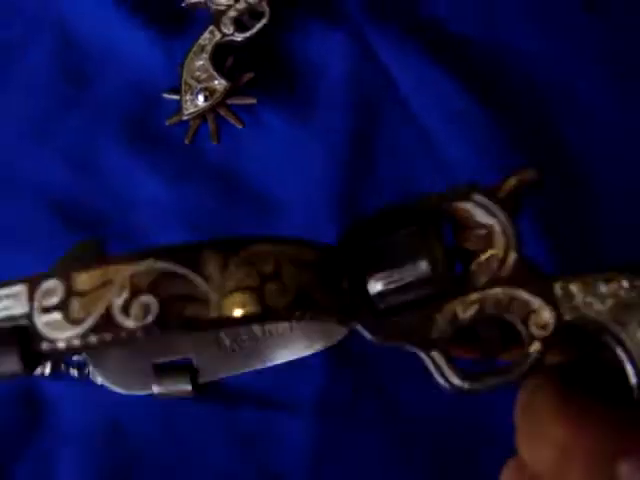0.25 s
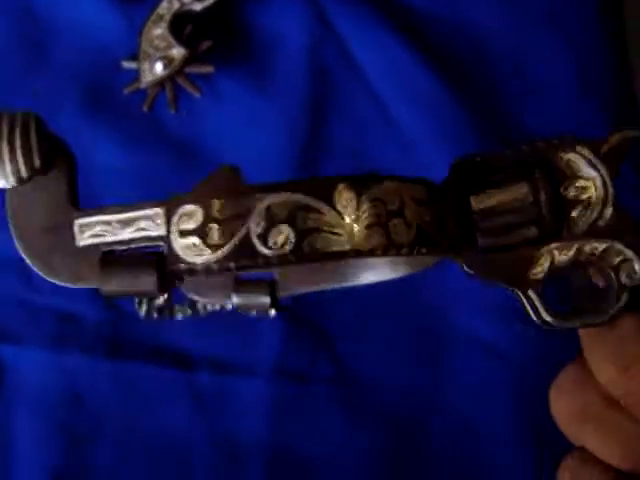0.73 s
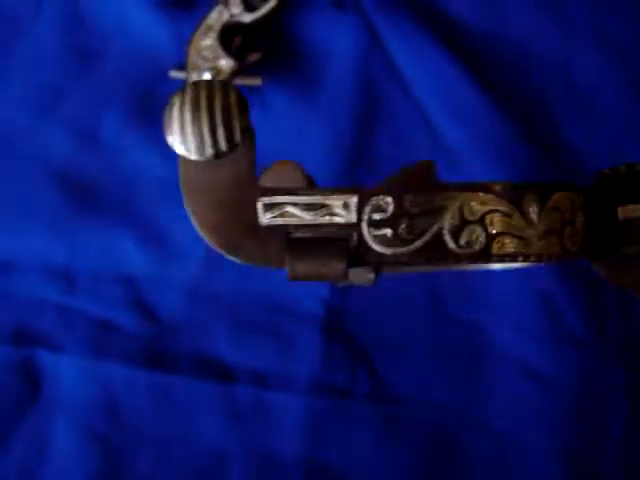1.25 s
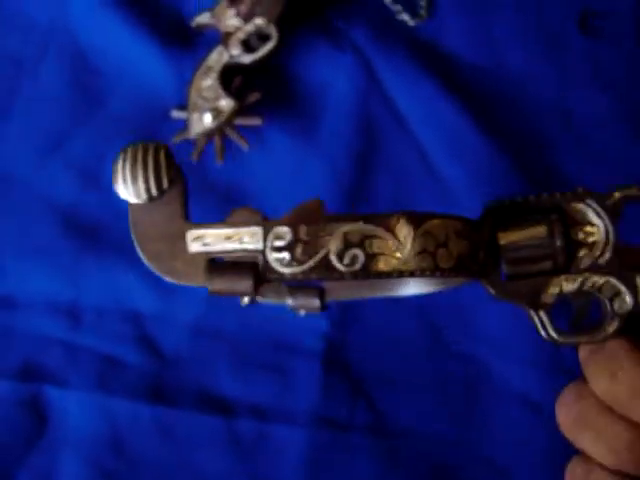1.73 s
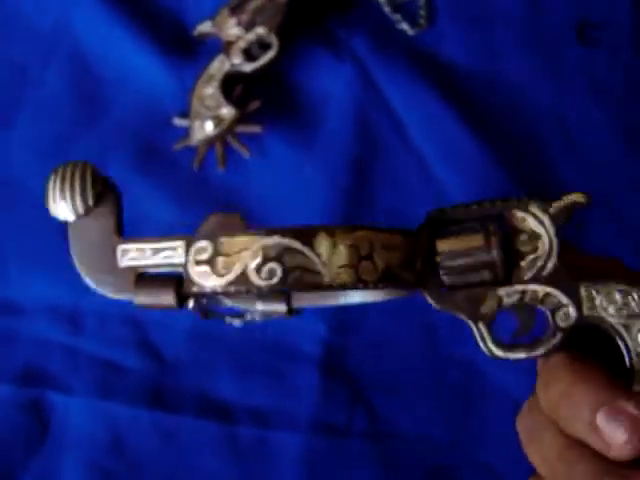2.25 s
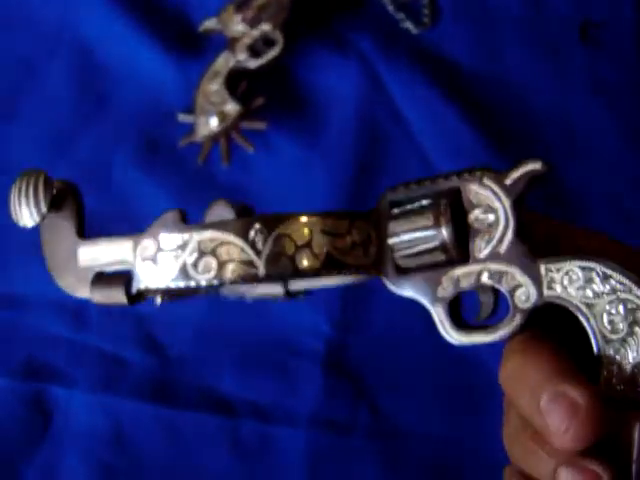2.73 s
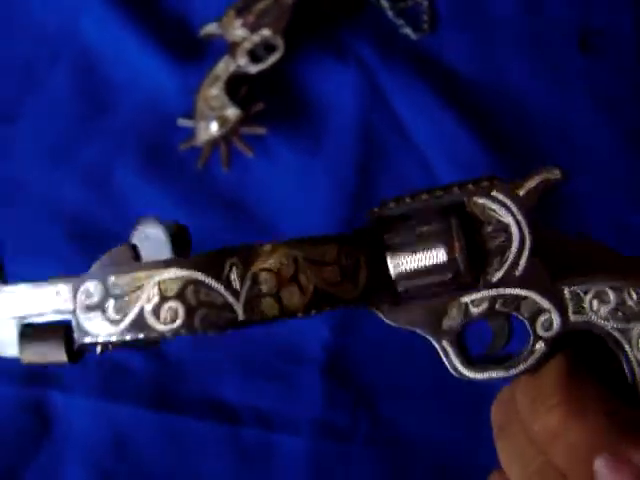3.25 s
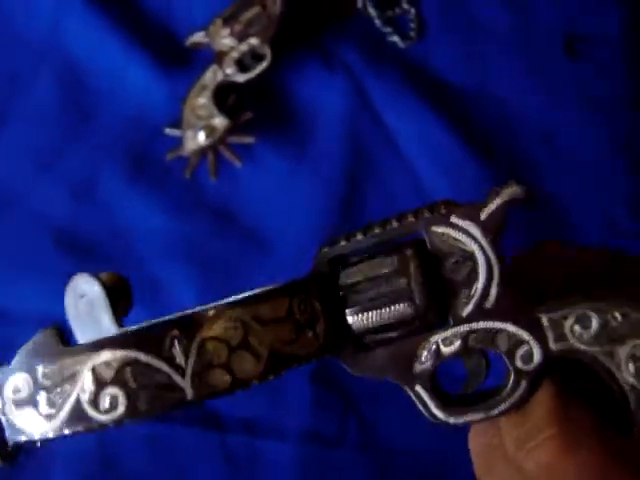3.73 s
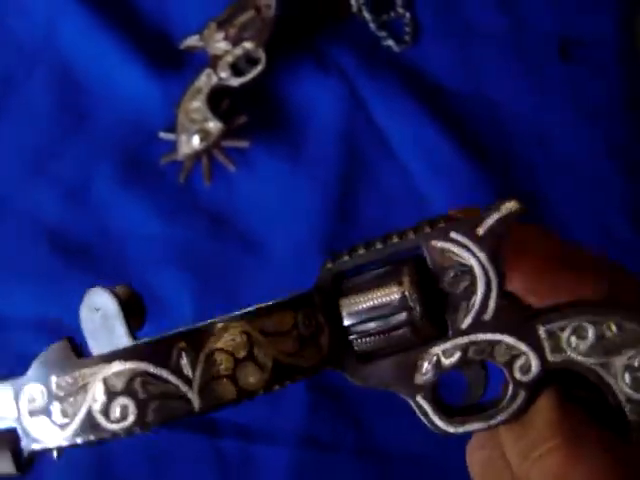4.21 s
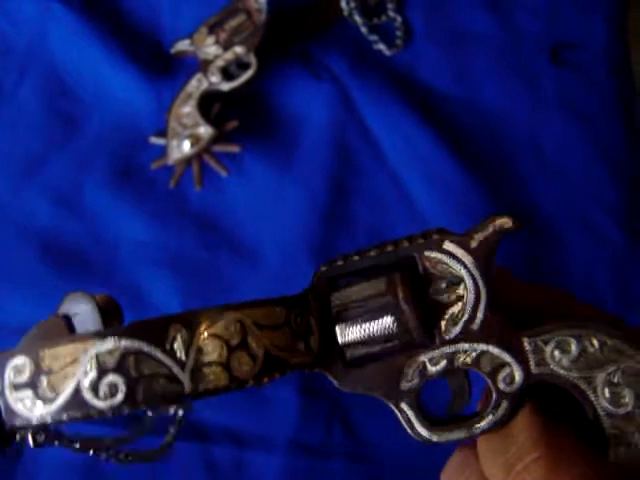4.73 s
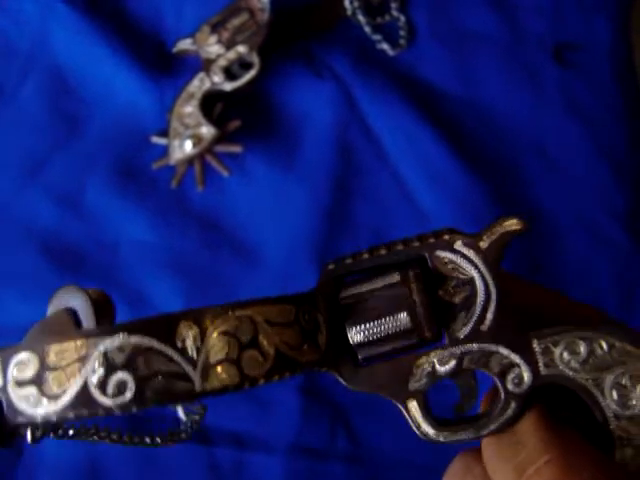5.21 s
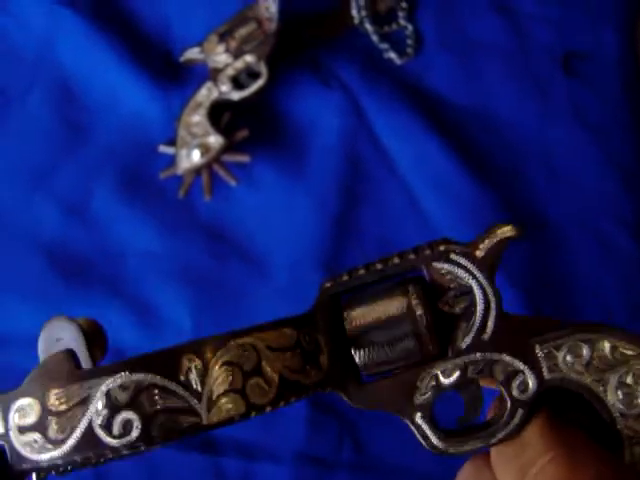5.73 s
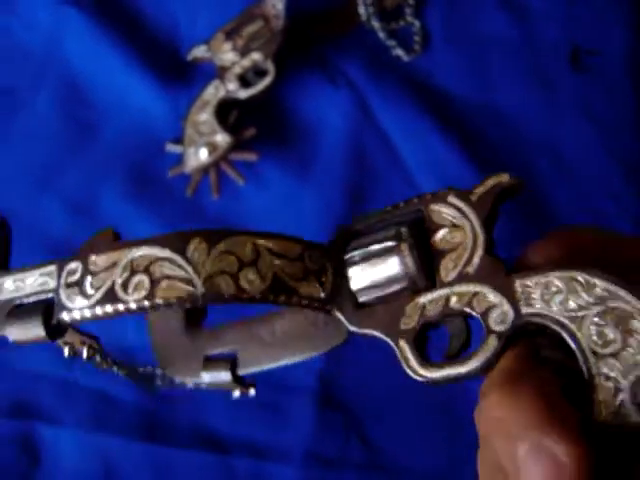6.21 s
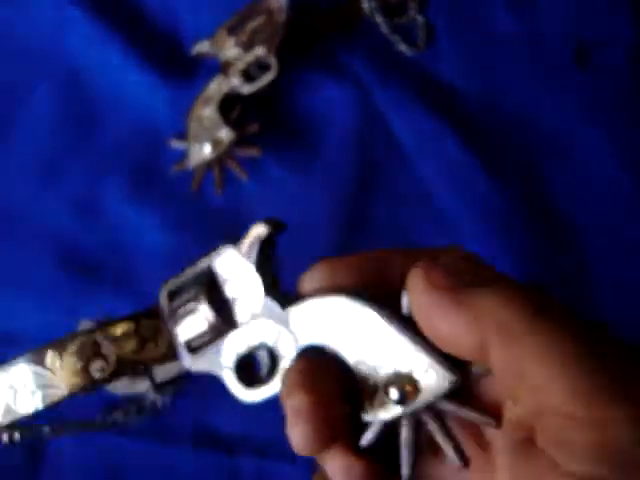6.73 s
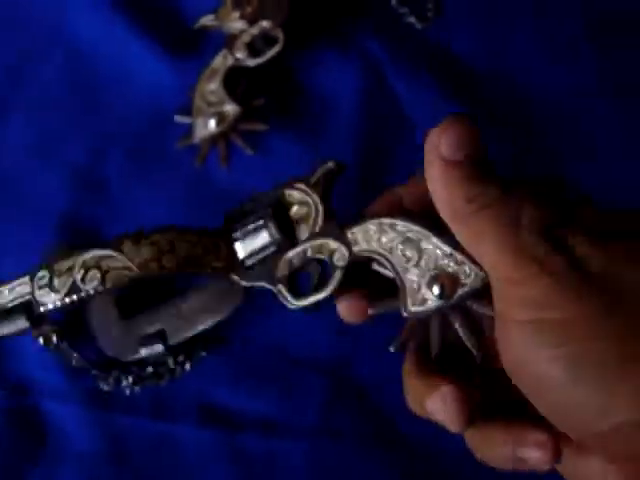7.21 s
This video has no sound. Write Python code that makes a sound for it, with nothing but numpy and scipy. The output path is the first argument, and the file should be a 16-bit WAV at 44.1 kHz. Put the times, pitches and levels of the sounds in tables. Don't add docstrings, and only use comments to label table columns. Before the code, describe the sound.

Bright metal links clink in a turning hand over a fading diesel hum, ending with faint birdsong, a dull knock and a final jangle.

```python
import sys
import numpy as np
from scipy import signal
from scipy.fft import rfft, irfft, next_fast_len
from scipy.io import wavfile
from scipy.ndimage import uniform_filter1d

SR = 44100
rng = np.random.default_rng(int(sys.argv[2]) if len(sys.argv) > 2 else 0)


def transcribe(signal):
    frames = np.atleast_2d(signal).T
    limited = np.clip(frames, -1, 1)
    pcm = np.round(limited * 32767).astype(np.int16)
    wavfile.write(sys.argv[1], SR, pcm)


def level_to_linear(level):
    exponent = np.asarray(level, float) / 20
    return 10 ** exponent


N = 329427
T = np.arange(N) / SR

# (time [s], cycle rate [Hz])
CYCLE_RATE = [(0, 11.726), (.8, 11.678), (1.2, 11.558), (2.0, 11.514), (2.3, 11.365), (2.9, 11.278),
              (3.4, 11.15), (3.8, 11.125), (4.7, 11.025), (5.3, 11.038), (5.8, 10.996), (6.2, 11.002),
              (6.7, 11.068), (7.2, 11.013), (7.47, 11.017)]
# (time [s], level [dB])
FIRING_NOTE = [(0, -20.5), (.6, -22.5), (1.0, -24.5), (1.3, -22.5), (1.9, -21), (2.2, -25), (3.2, -31.5),
               (3.7, -39), (4.0, -42), (4.2, -38), (4.4, -44), (4.7, -46.5), (5.2, -39.5), (5.6, -42.5),
               (7.47, -45)]
# (multiple of cycle [1], time [s], half width [s], level [dB])
PATH_SWELLS = [(17, 0, .7, -38), (17, 1.05, .15, -40), (17, 1.95, .45, -39), (17, 3.0, .4, -36),
               (17, 3.8, .3, -41.5), (17, 4.3, .2, -39), (17, 4.8, .25, -45), (17, 5.85, .7, -43.5),
               (16.5, 1.1, .55, -33), (16.5, 3.6, .45, -40.5)]
# (multiple of cycle [1], level over the roar [dB])
ENGINE_ORDERS = [(5, -24), (7, -40.5), (8, -20), (9, -17), (10, -25.5), (11, -12.5), (13, -23), (15, -20.5),
                 (18, -9), (19, -11.5), (20, -29.5), (21, -11.5), (22, -9.5), (23, -7.5), (24, -19),
                 (25, -41), (26, -22.5), (27, -12), (28, -16.5), (29, -18), (30, -27), (31, -15.5),
                 (32, -23.5), (33, -32), (35, -19)]
# (frequency [Hz], density [dB per Hz])
ROAR_COLOUR = [(25, -16), (55, -31.5), (110, -22.5), (150, -21), (175, 4), (215, 2.5), (330, -3),
               (480, -10), (900, -13.5), (1500, -23.5), (3000, -33), (6000, -42), (10500, -49)]
ROAR_DB, FADE_DB_PER_S, STANDS_S = -32, 2.5, 4.6
# (frequency [Hz], density [dB per Hz])
ROOM_COLOUR = [(22, -4.5), (50, 4), (120, 3.5), (150, 0.5), (250, 1.5), (500, -4), (1000, -9.5),
               (2000, -15.5), (4000, -21), (7000, -24.5), (10500, -26)]
ROOM_DB = -48

# (frequency [Hz], width [Hz], level [dB])
STEEL_MODES = [(4660, 280, 15), (4940, 160, -20.5), (5630, 62, 3), (6696, 140, 29.5), (7270, 37, -24.5),
               (7020, 49, -15.5), (8000, 27, -17.5), (8260, 130, -5.5), (8240, 67, -21.5), (8730, 360, 19),
               (9454, 23, 14.5), (9850, 33, -21)]
# (frequency [Hz], width [Hz], level [dB])
BAND_MODES = [(1180, 200, 9), (1950, 100, 5), (2580, 180, -13), (2903, 94, 1.5), (3350, 350, 0),
              (3900, 230, -12), (4400, 160, -13)]
# (time [s], peak level [dB], link note [Hz], ring t60 [s])
LOOSE_LINKS = [(0.1315, -47.5, 5900, .035), (0.4214, -39.5, 6750, .035), (.7336, -43, 5260, 0.066),
               (0.852, -43.5, 8320, 0.047), (0.8976, -30.5, 10300, 0.14), (1.317, -34, 8020, 0.11),
               (1.7328, -32, 8190, 0.072), (1.864, -38.5, 7240, 0.02), (2.1533, -41, 8220, 0.03),
               (3.271, -42, 6750, .03), (3.272, -43, 9570, .03), (3.6776, -41, 9200, 0.023),
               (4.058, -31.5, 6430, 0.027), (4.187, -46, 5420, .02), (4.3917, -43.5, 6380, 0.024),
               (5.0206, -42.5, 7920, .05), (5.365, -33, 9240, 0.035), (5.641, -35.5, 9630, 0.014),
               (5.67, -44, 6810, .035), (5.885, -47.5, 7200, .02), (6.074, -40, 8160, 0.026),
               (6.8825, -50, 8000, 0.032)]
LINK_BAND_DB = -21.5
# (time [s], peak level [dB], link note [Hz], heel band level [dB])
BAND_TAPS = [(.259, -40, 6750, -45), (0.336, -44.5, 5540, -46), (0.4546, -29.5, 6750, -41),
             (0.4695, -39, 9310, -41), (.682, -45, 6850, -44.5), (.711, -49.5, 5740, -49),
             (1.1987, -46, 4900, -41), (3.134, -42, 5740, -45), (3.218, -55.5, 7030, -49.5),
             (3.3445, -41, 8000, -33), (3.514, -54.5, 5450, -43.5), (4.09, -47, 7160, -59),
             (4.166, -45.5, 8360, -43.5), (4.801, -45, 5150, -41), (4.945, -50.5, 7700, -44),
             (5.11, -45.5, 6630, -48), (5.2695, -46, 8850, -46), (5.3807, -42, 7730, -37),
             (5.43, -47.5, 9550, -60), (5.4504, -42, 8600, -37), (5.747, -42, 4950, -50.5),
             (5.819, -47, 6750, -45), (7.331, -32, 7370, -38)]
# (time [s], peak level [dB], link note [Hz], heel band level [dB], ring t60 [s])
END_KNOCKS = [(0.165, -57, 4900, -49, 0.029), (0.1762, -17, 8730, -28, 0.012),
              (3.1213, -45, 4870, -35, 0.014), (3.665, -32, 5030, -42, 0.04),
              (4.5949, -37.5, 7100, -43.5, 0.013), (5.2765, -42, 4920, -48, .03),
              (5.659, -20, 6830, -30.5, 0.015), (5.688, -34.5, 8760, -44, .012),
              (5.8112, -33, 8000, -44, .017), (7.317, -26, 7370, -39, 0.06), (7.409, -40, 8220, -50, 0.05)]
TAP_T60_S, MIDDLE_HZ, END_HZ = 0.046, 2895, 4820
# (time [s], length [s], peak level [dB], one link [Hz], other link [Hz])
TAUT_RUNS = [(0.174, 0.0038, -28, 6430, 7240), (0.188, .002, -30.5, 3300, 3400),
             (4.8, .002, -30.5, 3440, 3316), (5.69, 0.0034, -43.5, 3750, 3900),
             (0.206, .02, -51.5, 8970, 9570), (3.12, 0.015, -42, 7280, 6800),
             (4.898, .009, -20.5, 6450, 6860), (4.923, 0.014, -38, 7440, 6860),
             (4.952, 0.029, -44, 7560, 7000), (5.45, .003, -34, 4600, 3800), (7.316, .004, -33, 4450, 4400),
             (5.658, .006, -29, 5700, 5710), (5.766, 0.02, -34, 5700, 6100),
             (5.763, 0.026, -35, 7400, 6150), (5.769, 0.0217, -32, 9300, 9950),
             (5.779, 0.011, -21, 6750, 6790), (5.817, 0.017, -44, 7020, 6340),
             (6.069, 0.021, -45.5, 9980, 5520), (6.075, .012, -41.5, 8100, 8170),
             (0.177, 0.0074, -38, 4250, 4200), (7.139, .039, -46, 9850, 9300),
             (7.22, 0.035, -35, 9900, 9260), (7.257, 0.022, -38.5, 6370, 6350),
             (7.321, .0085, -36.5, 4430, 4370)]
# (time [s], length [s], peak level [dB], one link [Hz], other link [Hz])
SLACK_RUNS = [(0.43, 0.013, -40, 7820, 9970), (0.44, 0.054, -46.5, 9540, 5660),
              (4.909, .016, -27, 7380, 7500), (4.912, .01, -28, 8000, 7300), (7.2, .07, -32, 11000, 9900),
              (7.199, 0.065, -38, 9300, 8700), (7.205, 0.033, -38, 6330, 7300),
              (7.3161, 0.014, -28.5, 7400, 6380), (7.31, 0.018, -33, 8320, 9560),
              (7.38, 0.042, -46, 6800, 7140), (7.39, 0.016, -44, 6370, 9730),
              (7.245, .04, -44.5, 7400, 7370)]
# (time [s], length [s], peak level [dB], link note [Hz])
FREE_SWINGS = [
    (0.896, 0.0096, -46, 5750),
    (1.31, .018, -42, 7880),
    (1.734, .013, -40.5, 9300),
    (2.147, 0.0053, -50, 9300),
    (5.784, .02, -37, 5630),
]
TAUT_T60_S, SLACK_T60_S, FREE_T60_S, ROWEL_HZ = 0.013, 0.035, 0.13, 5690
# (time [s], note [Hz], peak level [dB], t60 [s])
LONE_MODES = [(3.121, 2820, -42, .018), (3.121, 5850, -42, .02), (3.128, 4820, -40, .015),
              (3.134, 2800, -47, .015), (3.345, 3000, -35, .016), (3.345, 2250, -39, .014),
              (3.346, 5550, -43, .022), (5.38, 1900, -42, .018), (5.451, 4590, -35, .016),
              (5.453, 6300, -41, .015), (5.659, 4980, -33, .015), (5.66, 2850, -32, .018),
              (5.663, 9360, -40, .05), (5.672, 6770, -40, .018), (5.689, 3800, -41, .016),
              (5.768, 2880, -42, .04), (5.811, 4300, -42, .014), (5.811, 9700, -41, .018),
              (7.317, 4400, -34, .022), (7.317, 2480, -41, .02), (7.33, 2550, -39, .03),
              (7.329, 4250, -43, .05), (7.358, 8230, -48, .3), (7.409, 4440, -43, 0.033),
              (7.412, 4250, -51, 0.17), (7.41, 6400, -45, 0.15), (7.452, 6400, -49, .2),
              (5.8, 5650, -42, .07), (.1765, 2400, -40, .012), (5.366, 8000, -41, .016)]
# (time [s], length [s], level [dB],
# lowest [Hz], highest [Hz])
BRUSHES = [(3.368, 0.075, -53, 1300, 9040), (3.744, 0.072, -54, 3850, 10060),
           (4.446, 0.09, -57, 3498, 8900), (11, 0.051, -61, 5040, 10070),
           (6.468, 0.056, -59.5, 5960, 11000), (6.904, 0.011, -50, 2000, 12000),
           (6.3, 0.007, -53.5, 6500, 11000), (5.764, 0.026, -42, 4700, 9300),
           (7.2, 0.056, -49, 4500, 12000), (6.912, 0.062, -44.5, 310, 1460),
           (6.916, 0.034, -52, 2000, 9340), (7.09, 0.043, -59.5, 5920, 11000),
           (7.322, 0.026, -45.5, 770, 2200), (7.193, 0.026, -51.5, 1300, 2500),
           (4.592, 0.0065, -42, 600, 2700), (5.765, 0.022, -46.5, 1500, 5000),
           (5.665, 0.034, -52, 1500, 6200), (7.198, .03, -52, 1950, 2400),
           (5.658, 0.007, -41.5, 2100, 6500)]

# (time [s], pitch [Hz], level [dB])
BIRD_PHRASES = [
    [(6.208, 1650, -62), (6.22, 1720, -56), (6.236, 1640, -64)],
    [(6.352, 1620, -60), (6.373, 1620, -57), (6.385, 1750, -51), (6.398, 1610, -57), (6.432, 1600, -63)],
    [(6.53, 1600, -63), (6.552, 1750, -49.5), (6.57, 1610, -57), (6.605, 1610, -56), (6.62, 1755, -48),
     (6.636, 1627, -55), (6.672, 1610, -58)],
    [(6.686, 1590, -56), (6.703, 1685, -47.5), (6.728, 1540, -58)],
    [(6.724, 1870, -58), (6.743, 1920, -53), (6.762, 1850, -57)],
    [(6.962, 1680, -61), (6.978, 1720, -56), (6.993, 1670, -63)],
    [(7.028, 1765, -60), (7.05, 1610, -55), (7.073, 1575, -53), (7.096, 1630, -59)],
    [(7.094, 1890, -62), (7.11, 1970, -58), (7.126, 1890, -61)],
    [(7.118, 1430, -61), (7.14, 1380, -55), (7.162, 1410, -61)],
    [(7.16, 1614, -61), (7.185, 1630, -57), (7.215, 1626, -58), (7.238, 1745, -49), (7.252, 1630, -60)],
    [(7.212, 1500, -60), (7.228, 1480, -56), (7.262, 1540, -57), (7.275, 1530, -55)],
]

# (frequency [Hz], peak level [dB], t60 [s])
TABLE_MODES = [
    (58, -26, 0.18),
    (100, -24, 0.13),
    (159, -18, 0.076),
    (229.3, -24, 0.28),
    (256, -39, 0.29),
    (392, -38.5, .3),
]
BUMP_S = 6.893
# (time [s], peak level [dB], lowest [Hz], highest [Hz], fade [s])
TABLE_JUMPS = [
    (6.903, -35.5, 900, 4800, .0018),
    (6.908, -28.5, 600, 1700, 0.0021),
    (6.914, -39, 600, 1800, 0.0026),
    (6.9375, -36, 500, 3500, 0.0013),
    (6.953, -37.5, 600, 2180, .002),
    (6.96, -40, 500, 1600, .002),
]


def add(out, start_s, sound):
    i = int(start_s * SR)
    out[i:i + len(sound)] += sound[:N - i]


def peak(x, db):
    return x * level_to_linear(db) / np.max(np.abs(x))


def walk(rate, t=T):
    levels = rng.standard_normal(int(N / SR * rate) + 2)
    steps = uniform_filter1d(np.repeat(levels, 4), 4)
    return 1.2 * np.interp(t * rate * 4, np.arange(len(steps)), steps)


def hiss(colour, flicker_db):
    size = next_fast_len(N)
    octave = np.log2(np.arange(1, size // 2 + 2) * SR / size)
    hz, db = np.transpose(colour)
    spectrum = rfft(rng.standard_normal(size)) * level_to_linear(np.interp(octave, np.log2(hz), db))
    total = np.zeros(N)
    for centre in range(3, 16):
        weight = np.clip(1 - abs(octave - centre), 0, 1)
        total += irfft(spectrum * weight, size)[:N] * level_to_linear(flicker_db * walk(6))
    return total / np.std(total)


def engine():
    t = T[::10]
    cycle = 2 * np.pi * np.cumsum(np.interp(T, *np.transpose(CYCLE_RATE)))[::10] / SR
    boom_db = np.interp(t, *np.transpose(FIRING_NOTE)) + 0.54 + 0.7 * walk(11, t)
    boom = level_to_linear(boom_db) * np.sin(16 * cycle)
    for k, s, half_width, db in PATH_SWELLS:
        swell = level_to_linear(db) * np.exp(-((t - s) / half_width) ** 2)
        phase = -0.7 if k == 17 else 1.4
        boom += swell * np.sin(k * cycle + phase)
    orders = np.zeros(len(t))
    for k, db in ENGINE_ORDERS:
        level = level_to_linear(db + 2.6 * walk(2.5, t))
        orders += level * np.sin(k * cycle + 0.45 * walk(2, t) + k * k)
    roar = level_to_linear(ROAR_DB - FADE_DB_PER_S * np.minimum(T, STANDS_S))
    tones = np.sqrt(2) * boom + 1.12 * roar[::10] * orders
    tones = signal.resample_poly(tones, 10, 1, window=("kaiser", 10), padtype="line")[:N]
    return tones + roar * level_to_linear(-2.0) * hiss(ROAR_COLOUR, 0.9)


def room_air():
    return level_to_linear(ROOM_DB) * hiss(ROOM_COLOUR, 0.99)


def crack(low_hz, high_hz, fade_s):
    t = np.arange(int(0.02 * SR)) / SR
    band = signal.butter(2, [low_hz, high_hz], "band", fs=SR)
    noise = signal.lfilter(*band, rng.standard_normal(len(t)))
    burst = peak(noise * t * np.exp(-t / fade_s), 0)
    return np.pad(burst, (0, int(0.1 * SR) - len(t)))


def ring(modes, gains, t60, contact_s):
    hz, width, db = np.transpose(modes)[:, :, None]
    t = np.arange(int(0.1 * SR)) / SR
    decay = np.log(1000) / max(t60, 0.005) + 1.5 * width
    rise = 1 - np.exp(-(t / contact_s) ** 2)
    phase = rng.uniform(0, 2 * np.pi, hz.shape)
    envelope = np.exp(np.float32(np.maximum(-decay * t, -30)))
    waves = envelope * np.sin(np.float32(2 * np.pi * hz * t + phase))
    return rise * (np.float32(gains * level_to_linear(0.22 * db[:, 0])) @ waves)


def struck(body, bright_hz, focus_db, t60, contact_s):
    modes = np.vstack([body, (bright_hz, 30, 0)]).astype(float)
    modes[:-1, 0] *= 1 + 0.025 * rng.standard_normal(len(body))
    near = np.exp(-((modes[:, 0] / bright_hz - 1) / 0.077) ** 2)
    gains = level_to_linear(focus_db * near + 3.4 * rng.standard_normal(len(modes)))
    return peak(ring(modes, gains, t60, contact_s), 0)


def ticks():
    out = np.zeros(N)
    blows = [(s, db, hz, db + LINK_BAND_DB, MIDDLE_HZ, t60) for s, db, hz, t60 in LOOSE_LINKS]
    blows += [(*tap, MIDDLE_HZ, TAP_T60_S) for tap in BAND_TAPS]
    blows += [(*knock, END_HZ, t60) for *knock, t60 in END_KNOCKS]
    for s, top_db, bright_hz, band_db, band_hz, t60 in blows:
        steel = struck(STEEL_MODES, bright_hz, 11.0, t60, 0.0013)
        steel = steel + 0.51 * crack(0.63 * bright_hz, min(1.5 * bright_hz, 12000), 0.0015)
        focus_db = 7 if band_hz == MIDDLE_HZ else 5
        band = struck(BAND_MODES, band_hz, focus_db, 0.8 * t60, 0.00094)
        band = band + 1.1 * crack(0.55 * band_hz, 1.5 * band_hz, 0.0013)
        add(out, s - 0.0006, peak(steel, top_db - 1) + peak(band, band_db + 4.0))
    return out


def jangles():
    out = np.zeros(N)
    runs = [(*run, TAUT_T60_S) for run in TAUT_RUNS]
    runs += [(*run, SLACK_T60_S) for run in SLACK_RUNS]
    runs += [(*run, ROWEL_HZ, hz, FREE_T60_S) for *run, hz in FREE_SWINGS]
    for s, length, top_db, *links_hz, t60 in runs:
        run = np.zeros(int(0.2 * SR))
        places = np.arange(8) / 8 + rng.uniform(0, 0.1, 8)
        for tap, along in enumerate(places):
            sound = struck(STEEL_MODES, links_hz[tap % 2], 28.0, t60, 0.00092)
            sound = sound + 0.23 * crack(4500, 11000, 0.0011)
            add(run, along * length, sound * level_to_linear(-5 * along + 1.4 * rng.standard_normal()))
        add(out, s, peak(run, top_db))
    return out


def pings():
    out = np.zeros(N)
    for s, hz, db, t60 in LONE_MODES:
        pair = [(hz, 8.0, 0), (1.012 * hz, 30.0, 0)]
        sound = ring(pair, np.array([1, 0.5]), t60, 0.00086)
        sound = sound + 0.44 * crack(0.75 * hz, 1.2 * hz, 0.0011)
        add(out, s - 0.0006, peak(sound, db))
    return out


def rubs():
    out = np.zeros(N)
    for s, length, db, low_hz, high_hz in BRUSHES:
        count = int(1.37 * length * SR)
        grain = rng.standard_normal(count) * level_to_linear(2.5 * rng.exponential(size=count))
        band = signal.butter(2, [low_hz, high_hz], "band", fs=SR, output="sos")
        grain = signal.sosfilt(band, grain)
        add(out, s - 0.14 * length, grain / np.std(grain) * level_to_linear(db) * np.hanning(count) ** 0.5)
    return out


def bird():
    out = np.zeros(N)
    for phrase in BIRD_PHRASES:
        s, hz, db = np.transpose(phrase)
        t = np.arange(s[0] - 0.006, s[0] + 0.17, 1 / SR)
        waver = 1 + 0.22 * uniform_filter1d(rng.standard_normal(len(t)), 200)
        turn = 2 * np.pi * np.cumsum(np.interp(t, s, hz) * waver) / SR
        edge = np.clip(np.minimum(t - t[0], s[-1] + 0.006 - t) / 0.0073, 0, 1)
        whistle = np.sin(turn) + 0.05 * np.sin(2 * turn)
        add(out, t[0], level_to_linear(np.interp(t, s, db) + 3.5) * edge * whistle)
    return out + 0.2 * np.roll(out, int(0.013 * SR)) + 0.12 * np.roll(out, int(0.031 * SR))


def bump():
    out = np.zeros(N)
    t = np.arange(int(0.4 * SR)) / SR
    rings = np.zeros(len(t))
    for hz, db, t60 in TABLE_MODES:
        rings += level_to_linear(db) * np.exp(-np.log(1000) * t / t60) * np.sin(2 * np.pi * hz * t)
    late = t - 0.0045
    push = -level_to_linear(-16.0) * (1 - (late / 0.0011) ** 2 * 0.66) * np.exp(-(late / 0.0018) ** 2)
    add(out, BUMP_S, push + rings * (1 - np.exp(-(t / 0.023) ** 2)))
    return out


def landings():
    out = np.zeros(N)
    for s, db, low_hz, high_hz, fade_s in TABLE_JUMPS:
        add(out, s, level_to_linear(db) * crack(low_hz, high_hz, fade_s))
    return out


def scene():
    near = ticks() + jangles() + pings() + rubs() + landings()
    near = near + level_to_linear(-32.0) * np.roll(near, int(0.024 * SR)) + level_to_linear(-13.5) * np.roll(near, int(0.0053 * SR))
    return (near + bump() + engine() + bird() + room_air())[None]


def top_cut(x):
    return signal.sosfilt(signal.butter(12, 11040, fs=SR, output="sos"), x)


def record(dry):
    low_pass = signal.ellip(8, 0.2, 42, 9900, fs=SR, output="sos")
    mix = signal.sosfilt(low_pass, dry)
    return top_cut(mix)


dry = scene()
out = record(dry)
transcribe(out)
```